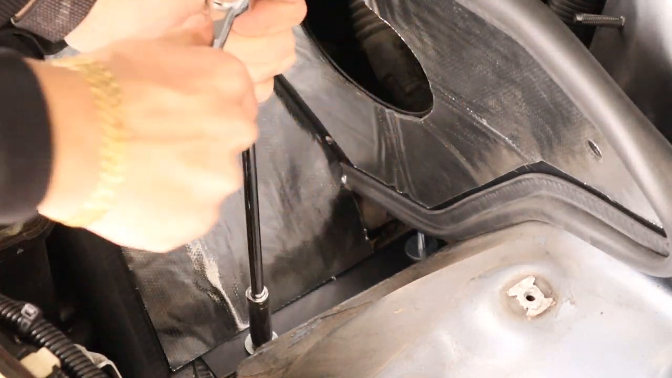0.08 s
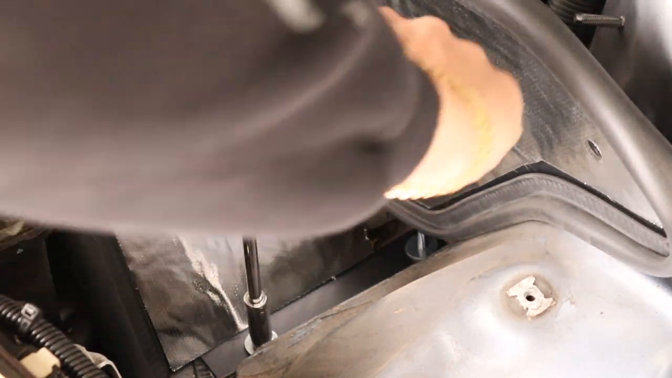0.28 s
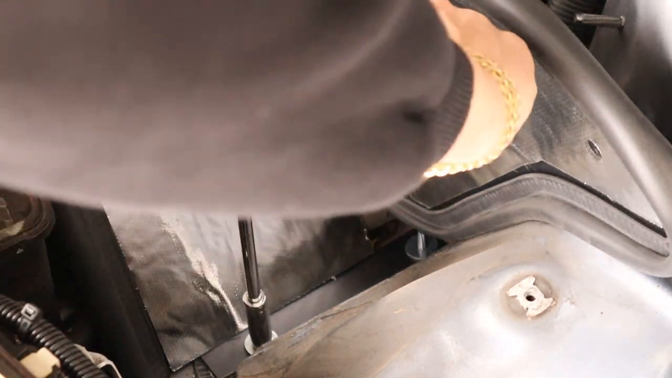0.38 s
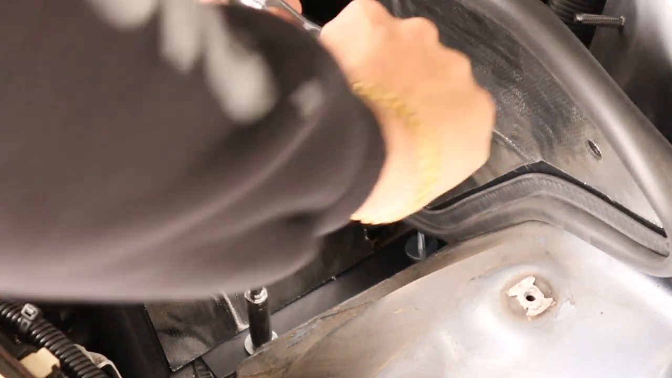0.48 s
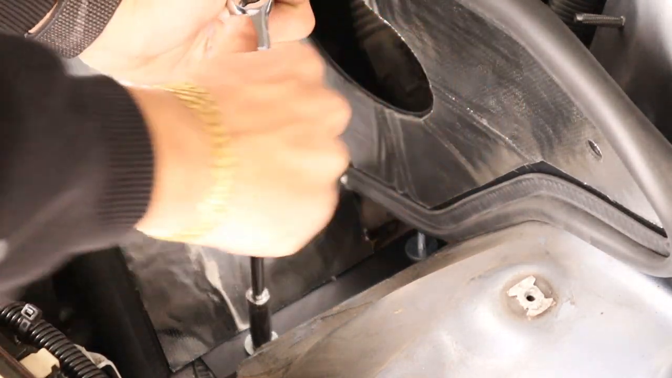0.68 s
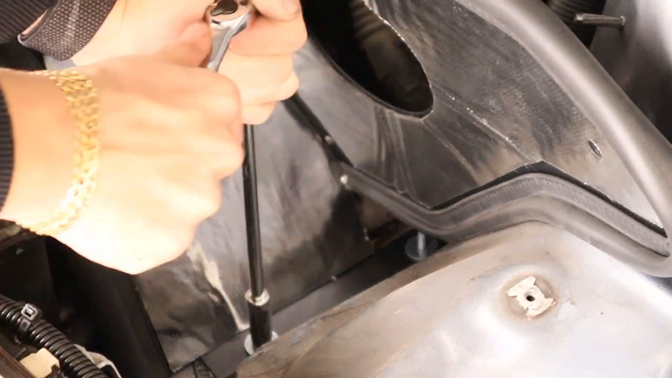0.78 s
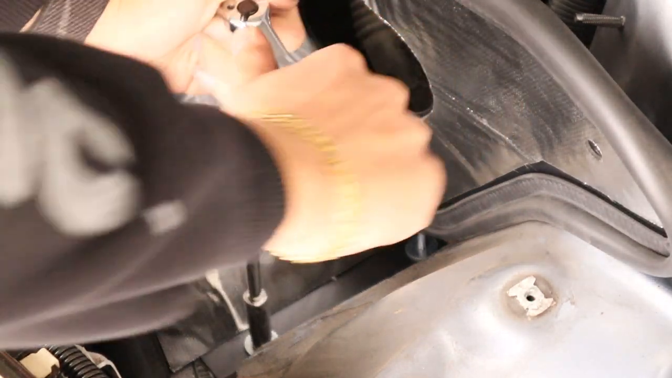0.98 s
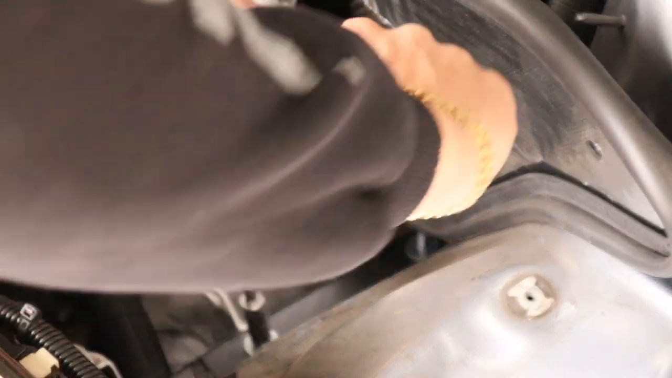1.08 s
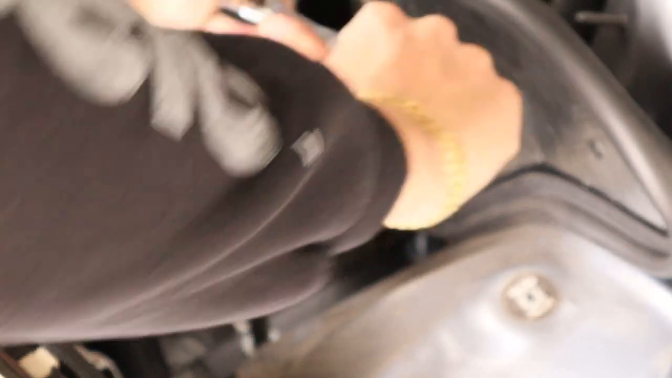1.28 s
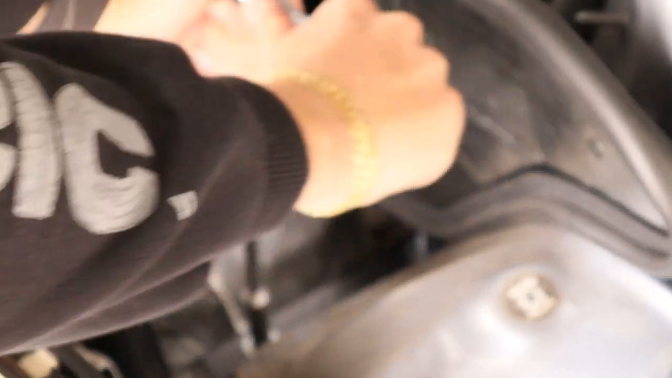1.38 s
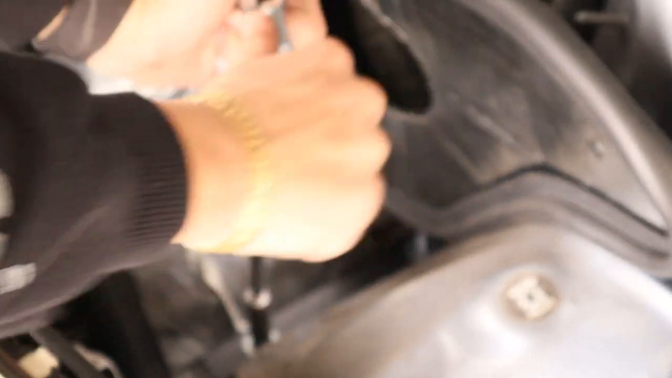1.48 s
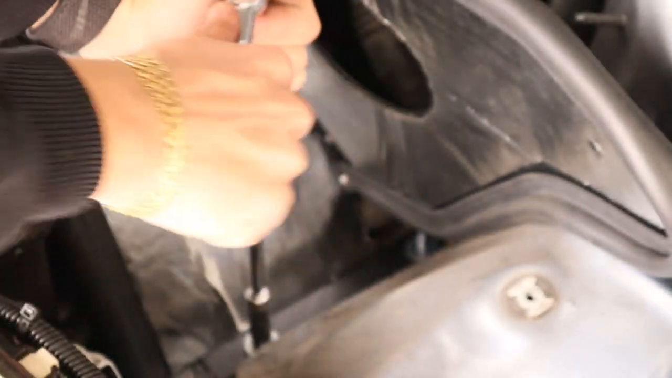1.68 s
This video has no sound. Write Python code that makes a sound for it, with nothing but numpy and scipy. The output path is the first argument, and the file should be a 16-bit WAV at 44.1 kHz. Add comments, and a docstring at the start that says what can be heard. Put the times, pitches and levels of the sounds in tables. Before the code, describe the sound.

A hand ratchet works a nut in a car's engine bay. At 0.2 seconds the socket gives a sharp metal knock, the loudest sound, ringing a body panel. Bright clicks follow from 0.3 to 0.45, slowing down. The thread scrapes faintly near 0.55 and rubs near 0.9. A second slowing run of clicks lasts from 1.05 to 1.25, with a lighter knock at 1.35. Faint taps follow in the quiet garage.

```python
"""In a garage, a hand ratchet on a long extension runs a nut down in a car's engine bay.
On each of two back swings the pawl drops over the teeth, a train of impacts that slows down.
The socket knocks in its play, and between the swings the nut grates and rubs on its thread by friction.
The extension conducts the impacts to a body panel, which rings in its normal modes.
The garage adds diffuse reverberation over a quiet background of air."""
import sys
import numpy as np
from scipy import signal
from scipy.fft import rfft, irfft
from scipy.io import wavfile

SR = 44100
rng = np.random.default_rng(int(sys.argv[2]) if len(sys.argv) > 2 else 0)


def wrap_up_sound(samples):
    """Save the sound to the file named by the first command line argument, as 16-bit audio."""
    columns = np.atleast_2d(samples).T
    # keep every value between -1 and 1, then stretch to whole-number steps
    tamed = np.clip(columns, -1, 1)
    steps = np.round(tamed * 32767).astype(np.int16)
    wavfile.write(sys.argv[1], SR, steps)


N = 77175
T = np.arange(N) / SR
HZ = np.maximum(np.arange(N // 2 + 1) * SR / N, 1)


# Drops of the pawl over a tooth: start_s, tick_db, resonance_hz, treble_db, panel_db
TOOTH_DROPS = [(0.276, -41, 7700, 5.5, -55), (.2878, -41, 8300, -6, -51), (.3020, -44, 4800, 6, -34.5),
               (0.314, -37.5, 4400, -7, -37), (.3253, -37.5, 5500, -2, -43.5), (.3408, -41, 4600, 2, -48),
               (.3550, -41.5, 4800, -6, -44.5), (.3745, -41, 3900, -4, -35.5),
               (0.3987, -40.5, 4000, -8.5, -62), (.4484, -42.5, 3630, -7, -40.5),
               (1.0532, -41, 7950, 8, -51.5), (1.0641, -44.5, 7950, 6, -52.5),
               (1.0752, -40, 7400, -2, -50.5), (1.0858, -42, 4600, 4, -54), (1.0972, -41, 7250, 0, -52.5),
               (1.1098, -40, 6000, 4.5, -68), (1.1222, -39.5, 5450, 2, -46.5), (1.1381, -39, 5070, -1, -45),
               (1.1560, -40, 7340, 3, -64), (1.1778, -42, 5800, 3, -45), (1.1946, -43.5, 4970, 2, -43.5),
               (1.2160, -45.5, 7160, 6, -46), (1.2525, -42.5, 4960, -8, -44.5),
               (1.3542, -41, 4870, 3, -46.5)]
# Spectral envelope of a tick: frequency_hz, gain_db
TICK_SPECTRUM = [(1000, -5), (2200, 2.5), (3400, 6.5), (5200, 7), (6500, 3), (8300, 7.5), (10000, -0.5),
                 (13000, 3), (16000, -7)]

def pawl():
    """Impact excitation: each tooth gives a bright tick with a broad resonance of its own."""
    out, colour = np.zeros(N), spectrum(TICK_SPECTRUM)
    peak_db, width_oct, shelf_hz = 6, 0.28, 10100
    shelf = 1 / (1 + (shelf_hz / HZ) ** 8)
    for start_s, tick_db, resonance_hz, treble_db, _ in TOOTH_DROPS:
        resonance = np.exp(-.5 * (np.log2(HZ / resonance_hz) / width_oct) ** 2)
        emphasis = from_db(peak_db * resonance + treble_db * shelf)
        tick = burst(colour * emphasis, rise_s=.0005, hold_s=.002, t60_s=.016)
        out += from_db(tick_db) * delayed(tick, start_s)
    return out


# Knocks of the socket in its play: start_s, steel_db, panel_db, thud_db
SOCKET_KNOCKS = [(0.1995, -21, -16, -36), (0.2174, -74, -28.5, -39.5), (0.988, -74, -51.5, -72),
                 (1.0351, -49, -50, -63), (1.044, -45, -56.5, -52), (1.272, -56, -50.5, -72),
                 (1.3185, -74, -54, -89), (1.358, -46.5, -40.5, -49.5), (1.661, -74.5, -64.5, -65.5),
                 (1.736, -81, -61, -59)]
# Normal modes of the socket and extension: pitch_hz, relative_db, t60_s
STEEL_MODES = [(4420, -6, 0.034), (4880, 5, 0.02), (5434, -1.5, .03), (7055, 1.5, 0.023),
               (7810, 1.5, 0.028), (8360, 4, 0.037), (9650, -8, 0.014), (10870, -6, 0.022),
               (15100, -7.5, 0.017)]
# Spectral envelope of the crack: frequency_hz, gain_db
CRACK_SPECTRUM = [(700, -9), (2000, -10), (2800, 4.5), (5000, 2), (8300, 4), (10500, -3.5), (16000, -7.5)]
# Spectral envelope of the thud: frequency_hz, gain_db
THUD_SPECTRUM = [(60, -29), (130, -12.5), (240, 8), (330, 2.5), (480, 3), (900, -17), (7000, -29),
                 (11000, -40), (16000, -55.5)]

def socket():
    """Backlash: steel crosses the play and strikes steel, giving a crack, a short ring and a low thud."""
    out, hardest_db = np.zeros(N), max(row[1] for row in SOCKET_KNOCKS)
    ring_growth = 1.7  # dB of ring per dB of blow: light knocks hardly ring
    for start_s, steel_db, _, thud_db in SOCKET_KNOCKS:
        crack = burst(spectrum(CRACK_SPECTRUM), rise_s=.00028, hold_s=.0014, t60_s=.017)
        steel = from_db(-26.5 + ring_growth * (steel_db - hardest_db)) * ring(STEEL_MODES)
        thud = burst(spectrum(THUD_SPECTRUM), rise_s=.0045, hold_s=.0029, t60_s=.31)
        out += delayed(from_db(steel_db - 6) * crack + steel + from_db(thud_db) * thud, start_s)
    return out


# Normal modes of the body panel: pitch_hz, relative_db, t60_s
PANEL_MODES = [(432, -18.5, 0.18), (536.2, -1.5, 0.11), (590, 3.5, 0.061), (720, -7, 0.081),
               (784, -9, 0.063), (888, -12.5, 0.12), (961, -10.5, .07), (1173, -2, 0.042),
               (1240, -14, 0.12), (1376, -13.5, 0.095), (1740, -23.5, 0.037), (1872, -6, 0.062),
               (2274, -21, 0.11), (2293, -9, 0.089)]
# Spectral envelope of the panel's dense clatter: frequency_hz, gain_db
CLATTER_SPECTRUM = [(200, -18), (330, -10), (470, -7.5), (560, 1), (670, -4.5), (790, 6), (1020, -18.5),
                    (1230, -3), (1490, -15.5), (1640, -0.5), (2000, -20.5), (2300, -7.5), (2800, -46.5),
                    (5000, -38), (15000, -54.5)]

def panel():
    """Structure-borne sound: each contact runs down the extension and sets the sheet metal ringing."""
    blows = [(start_s, panel_db) for start_s, _, _, _, panel_db in TOOTH_DROPS]
    blows += [(start_s, panel_db) for start_s, _, panel_db, _ in SOCKET_KNOCKS]
    blows += [(start_s, panel_db) for start_s, _, panel_db in THREAD_SLIPS]
    out, colour = np.zeros(N), spectrum(CLATTER_SPECTRUM)
    for start_s, panel_db in blows:
        clatter = from_db(-5) * burst(colour, rise_s=.0012, hold_s=.0036, t60_s=.058)
        ringing = from_db(-4) * delayed(ring(PANEL_MODES), delay_s=.00037)
        out += from_db(panel_db) * delayed(clatter + ringing, start_s)
    return out


# Slips of the nut on its thread: start_s, scrape_db, panel_db
THREAD_SLIPS = [(.533, -62, -57.5), (.5435, -52, -56), (.55, -50, -52), (.574, -50.5, -46.5),
                (0.592, -61, -48), (1.017, -68.5, -58), (1.339, -58.5, -54)]
# Spectral envelope of a slip: frequency_hz, gain_db
SCRAPE_SPECTRUM = [(200, 1), (1000, -7.5), (2500, -2.5), (4000, 2), (5800, -2), (8000, -20), (11000, -46),
                   (16000, -40)]
# Rubbing of thread and hand while the handle is loaded: centre_s, half_length_s, level_db
RUB_SWELLS = [(.12, 0.13, -68), (0.555, 0.036, -54), (0.898, 0.048, -62), (1.046, 0.013, -58)]
# Spectral envelope of the rubbing: frequency_hz, gain_db
RUB_SPECTRUM = [(100, -7), (250, 8), (420, 3), (580, 2), (900, -0.5), (1400, 0), (2200, -5.5), (4500, -12),
                (8000, -21.5), (15000, -34.5)]

def thread():
    """Friction: sudden slips give gritty scrapes, and sliding gives soft swells of noise."""
    slips = np.zeros(N)
    for start_s, scrape_db, _ in THREAD_SLIPS:
        scrape = burst(spectrum(SCRAPE_SPECTRUM), rise_s=.0005, hold_s=.001, t60_s=.01)
        slips += from_db(scrape_db) * delayed(scrape, start_s)
    swell = sum(from_db(level_db) * np.exp(-((T - centre_s) / half_length_s) ** 2)
                for centre_s, half_length_s, level_db in RUB_SWELLS)
    return slips + swell * noise(spectrum(RUB_SPECTRUM))


# Reverberation of the garage relative to the direct sound: frequency_hz, level_db
REVERB_LEVELS = [(100, 0.5), (250, -11.5), (600, -14), (1500, -11), (3000, -13), (5000, -12), (9000, -25),
                 (15000, -22.5)]
# Reverberation time of the garage: frequency_hz, t60_s
REVERB_TIMES = [(150, 0.43), (600, .85), (2000, 0.63), (5000, 0.27), (9000, 1), (15000, 0.13)]

def garage(direct):
    """Diffuse reverberation: each half-octave band stores energy and returns it as decaying noise."""
    out, direct_spectrum = np.zeros(N), rfft(direct)
    for hz in 125 * 2 ** (np.arange(15) / 2):
        band = np.sqrt(np.maximum(1 - 2 * abs(np.log2(HZ / hz)), 0))
        power = irfft(direct_spectrum * band, N) ** 2
        retained = 10 ** (-6 / (at_hz(REVERB_TIMES, hz) * SR))  # share of energy left after one sample
        energy = signal.lfilter([1 - retained], [1, -retained], power)
        out += from_db(at_hz(REVERB_LEVELS, hz)) * np.sqrt(energy) * noise(band)
    return delayed(out, delay_s=.014)


# Level of the background air: time_s, level_db
AIR_LEVELS = [(0, -67.5), (.2, -66), (.75, -70), (1.2, -64), (1.75, -69)]
# Spectral envelope of the air: frequency_hz, gain_db
AIR_SPECTRUM = [(40, -8.5), (80, -3.5), (200, -5), (600, -8.5), (1200, -15), (2500, -21), (6000, -23),
                (11000, -30.5), (16000, -35)]

def air():
    """Ambient noise: a faint, dark hush whose level drifts slowly."""
    level_db = np.interp(T, *np.transpose(AIR_LEVELS))
    return from_db(level_db) * noise(spectrum(AIR_SPECTRUM))


def burst(gains, rise_s, hold_s, t60_s):
    """Modal overlap: close modes struck at once decay as noise, with duller scatter from the bay."""
    bay_db, bay_t60_s, bay_cutoff_hz = -8, .11, 9000
    decay = np.log(1000) * np.maximum(T - rise_s - hold_s, 0)
    bay_lowpass = 1 / np.sqrt(1 + (HZ / bay_cutoff_hz) ** 6)
    direct = noise(gains) * np.exp(-decay / t60_s)
    scatter = from_db(bay_db) * noise(gains * bay_lowpass) * np.exp(-decay / bay_t60_s)
    return unit_blow(np.minimum(T / rise_s, 1) * (direct + scatter))


def ring(modes, spread_db=1.46):
    """Free vibration: damped sines, among which each blow shares its energy a little differently."""
    t, out = T[:N // 4], np.zeros(N)
    for k, (pitch_hz, relative_db, t60_s) in enumerate(modes):
        amplitude = (-1) ** k * from_db(relative_db + spread_db * rng.standard_normal())
        decay = np.exp(-np.log(1000) * t / t60_s)
        out[:len(t)] += amplitude * np.sin(2 * np.pi * pitch_hz * t) * decay
    return unit_blow(out)


def from_db(db):
    """Amplitude ratio of a level in decibels."""
    return 10 ** (np.asarray(db) / 20)


def at_hz(points, hz):
    """Interpolation on a log-frequency axis."""
    frequencies, values = np.transpose(points)
    return np.interp(np.log(hz), np.log(frequencies), values)


def spectrum(points):
    """Spectral envelope as gains, falling 12 dB per octave below the first point."""
    return from_db(at_hz(points, HZ)) * np.minimum(HZ / points[0][0], 1) ** 2


def noise(gains):
    """Random phases turn a spectrum into noise of rms 1."""
    x = irfft(gains * np.exp(2j * np.pi * rng.random(len(HZ))), N)
    return x / x.std()


def unit_blow(x):
    """Normalisation to the energy of 10 ms at rms 1."""
    return x / np.sqrt(np.sum(x ** 2) / (.01 * SR))


def delayed(x, delay_s):
    """Pure time delay."""
    start = int(np.clip(delay_s * SR, 0, N - 1))
    return np.concatenate([np.zeros(start), x[:N - start]])


def scene():
    """Superposition of the tool, too small to radiate deep bass, the air and the reverberation."""
    low_cut = signal.butter(2, 110, "high", fs=SR, output="sos")
    tool = signal.sosfilt(low_cut, pawl() + socket() + panel() + thread())
    return (tool + air() + garage(tool))[None]


def record(dry):
    """Band limiting: a steep low-pass removes the highest treble."""
    cutoff_hz = 15800
    return signal.sosfilt(signal.ellip(10, .2, 80, cutoff_hz, fs=SR, output="sos"), dry)


dry = scene()
out = record(dry)
wrap_up_sound(out)
```